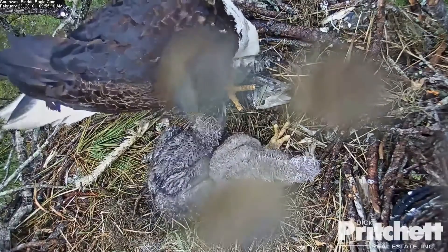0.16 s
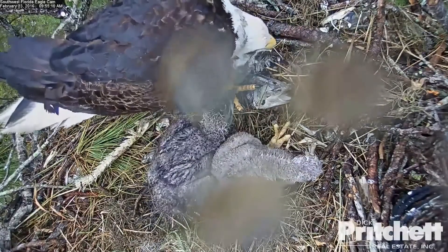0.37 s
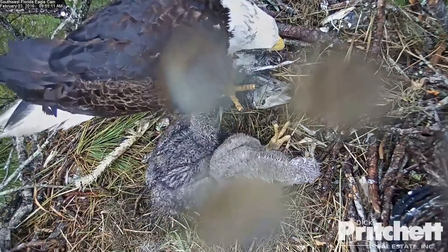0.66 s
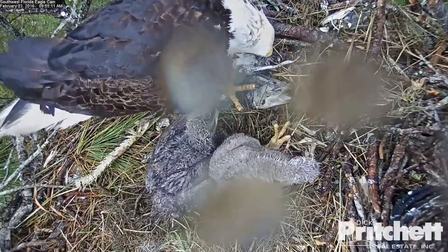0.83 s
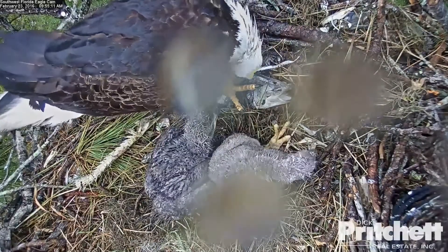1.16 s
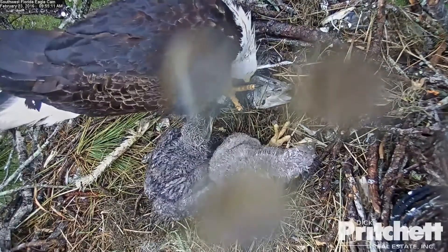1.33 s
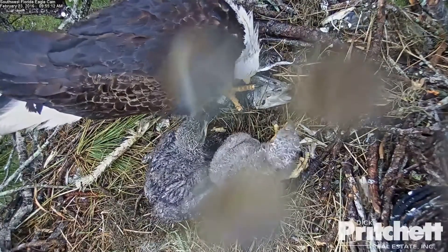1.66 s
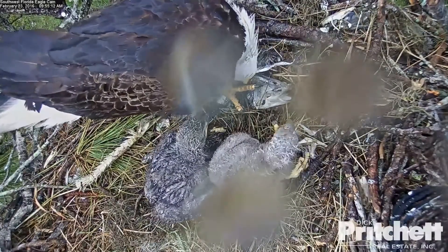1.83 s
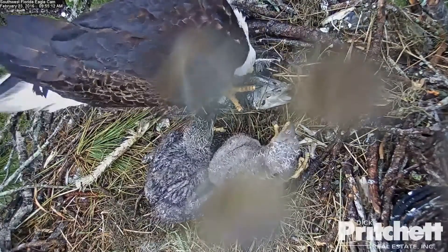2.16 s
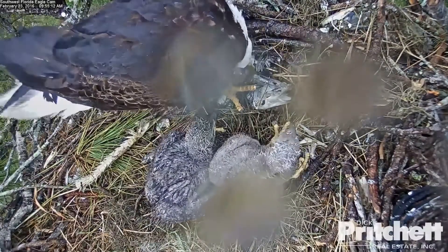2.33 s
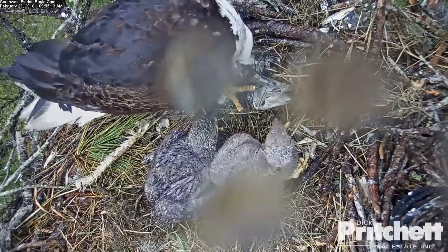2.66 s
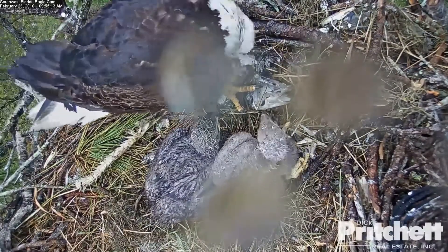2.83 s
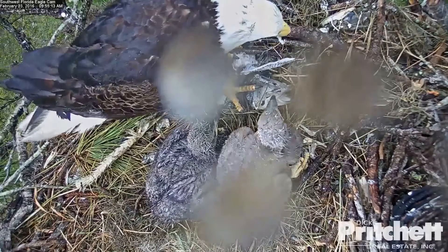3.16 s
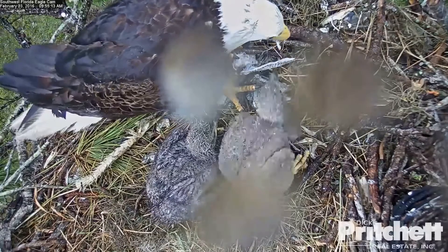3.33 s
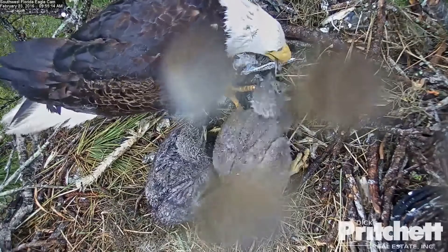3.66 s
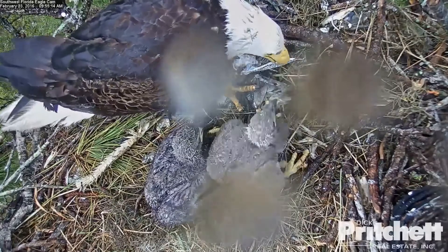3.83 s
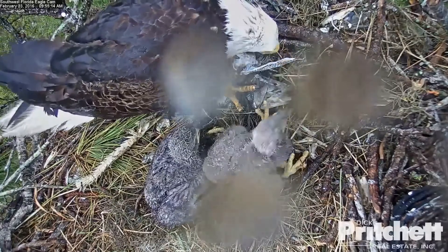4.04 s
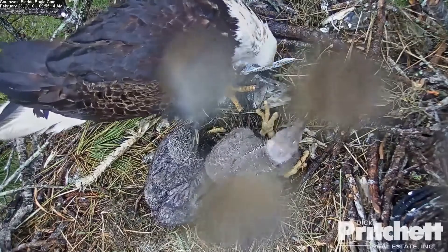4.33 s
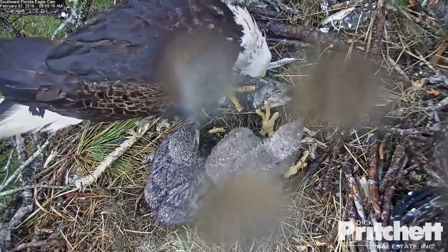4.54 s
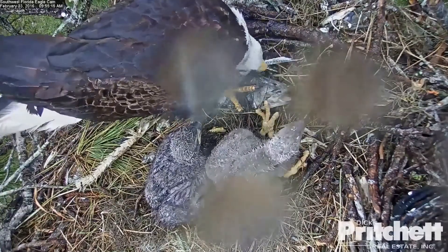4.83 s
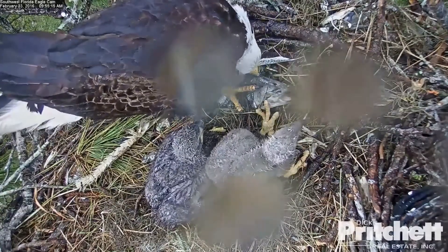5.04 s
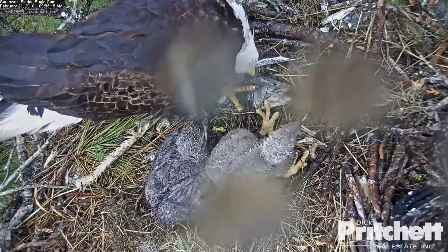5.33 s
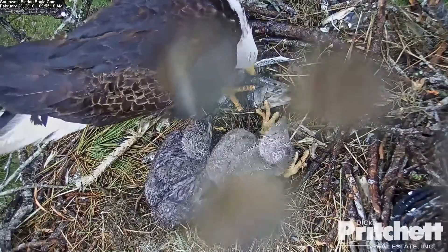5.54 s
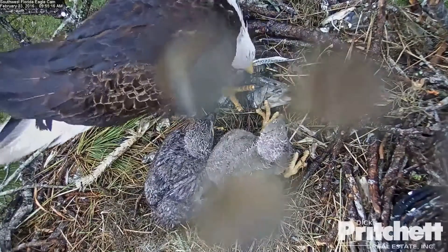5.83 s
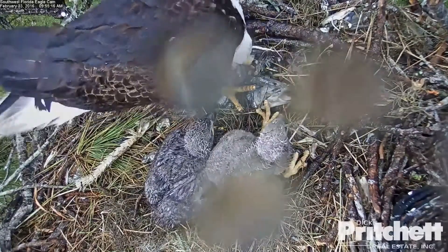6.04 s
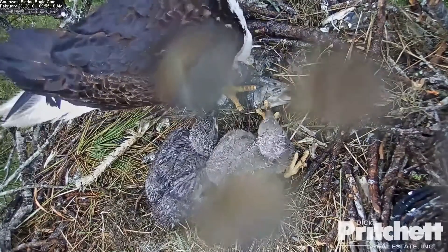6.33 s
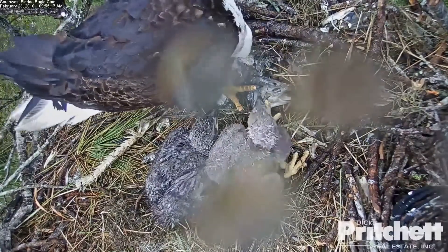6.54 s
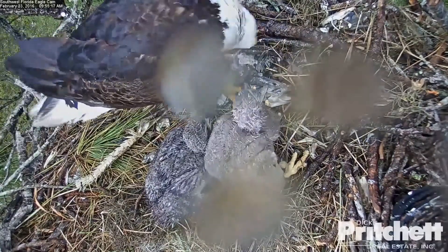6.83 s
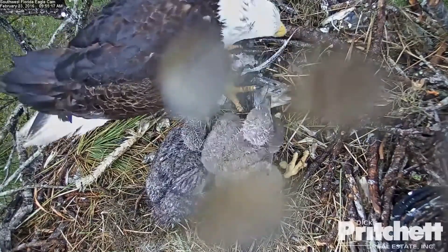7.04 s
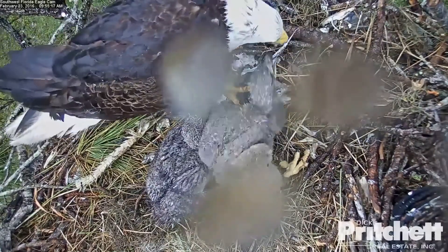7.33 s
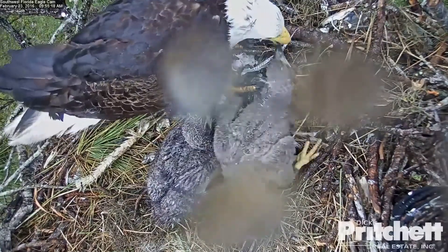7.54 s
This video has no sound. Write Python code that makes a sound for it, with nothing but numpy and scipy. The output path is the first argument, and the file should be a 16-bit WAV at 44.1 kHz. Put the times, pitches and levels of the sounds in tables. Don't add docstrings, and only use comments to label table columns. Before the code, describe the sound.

Thin, high whistles, tiny chips and one louder squealing call from young eagles, with steady rain hiss and lumpy wind buffeting the microphone.

```python
import sys
import numpy as np
from scipy import signal
from scipy.io import wavfile
from scipy.ndimage import uniform_filter1d

SR = 44100
rng = np.random.default_rng(int(sys.argv[2]) if len(sys.argv) > 2 else 0)


def linear_from_db(decibels):
    return 10 ** (np.asarray(decibels, float) / 20)


def master_out(mix):
    frames = np.transpose(np.atleast_2d(mix))
    ceiling = np.clip(frames, -1, 1)
    pcm = np.round(ceiling * 32767).astype(np.int16)
    wavfile.write(sys.argv[1], SR, pcm)


N = 338688
LATE_S = 1.682


def evened(x):
    return x / np.sqrt(np.mean(x ** 2) + 1e-20)


def steadied(x, hz):
    power = uniform_filter1d(x ** 2 + 1e-9, int(SR / hz))
    return evened(x / power ** .3)


def add(mix, s, sound):
    start = max(round((s + LATE_S) * SR), 0)
    part = mix[start:][:len(sound)]
    part += sound[:len(part)]


def wander(length, hz):
    span = max(int(SR / hz), 2)
    hiss = rng.standard_normal(length + 2 * span)
    return evened(uniform_filter1d(uniform_filter1d(hiss, span), span))[span:-span]


def noise(length, shape, size, patchy_db, wide, long):
    frames, hz = length * 4 // size + 5, np.fft.rfftfreq(size, 1 / SR)
    real, imaginary, patches = rng.standard_normal((frames, len(hz), 3)).T
    patches = uniform_filter1d(patches, max(int(wide), 1), 0)
    patches = evened(uniform_filter1d(patches, max(int(long), 1), 1))
    f, db = np.transpose(shape)
    colour_db = np.interp(np.log(hz + 1), np.log(f + 1), db, -90, -90)
    z = (real + 1j * imaginary) * linear_from_db(colour_db[:, None] + patchy_db * patches)
    return evened(signal.istft(z, nperseg=size, noverlap=size * 3 // 4)[1][:length])


def rain(length):
    # f/Hz, level per Hz/dB
    rush_colour = [(120, -31), (200, -1.5), (350, -9), (560, -12), (900, -17), (1390, -9.5), (1790, -13.5),
                   (2800, -7), (3700, -15.5), (5200, -31), (6850, -40.5), (7300, -48.5), (10500, -39.5),
                   (15000, -48.5)]
    # t/s, peak level/dB, f/Hz
    drops = [
        (0.7168, -14.5, 3050),
        (1.5194, -22, 4070),
        (1.7494, -23, 3570),
        (5.037, -29.5, 2820),
    ]
    rush_db = -30 - 2.9 - 1.6 * np.arange(length) / length
    out = linear_from_db(rush_db) * noise(length, rush_colour, size=512, patchy_db=1.16, wide=6, long=14)
    t = np.arange(300) / SR
    for s, db, hz in drops:
        decay = linear_from_db(db + 1 - 60 * t / 0.013)
        ring = np.sin(2 * np.pi * hz * t * (1 - 20. * t))
        add(out, s, decay * ring * np.minimum(t / .0004, 1))
    return out


def fuzzy(rows, length, width_hz, steady):
    out = np.zeros(length)
    for s, long, hz, db in rows:
        t = np.arange(0, long * 1.4, 1 / SR)
        size = wander(len(t), width_hz) + 1j * wander(len(t), width_hz) + steady
        drift = 1 + .025 * wander(len(t), 5)
        ringing = size * np.exp(2j * np.pi * np.cumsum(hz * drift) / SR)
        swell = np.hanning(len(t)) ** .7
        add(out, s - long * .2, linear_from_db(db) * evened(ringing.real) * swell)
    return out


def far_hums(length):
    # t/s, length/s, f/Hz, level/dB
    hums = [(-1.7, .2, 375, -43), (-1.35, .15, 360, -44), (-1.5, .3, 485, -47), (-.8, .5, 360, -43),
            (1.5, .16, 548, -44), (1.63, .14, 405, -42), (1.8, .4, 525, -47), (2.0, .26, 408, -42),
            (2.58, .16, 400, -39), (2.26, .12, 460, -44), (3.8, .12, 478, -43), (4.52, .14, 318, -43),
            (6.7, .14, 392, -41), (6.96, .12, 395, -40), (-1.2, .4, 236, -42), (1.55, .2, 270, -42),
            (.4, .9, 262, -45), (4.4, .16, 415, -43), (-.55, .25, 345, -43), (2.6, .12, 345, -42),
            (-.2, 1.6, 372, -46), (1.3, 1.3, 385, -46)]
    return linear_from_db(1.8) * fuzzy(hums, length, 18, 1.6)


def far_buzzes(length):
    # t/s, length/s, centre f/Hz, relative level/dB
    buzzes = [
        (-1.4, .2, 6300, -4),
        (-1.03, .1, 6300, -4),
        (1.83, .12, 6450, 2),
        (3.2, .12, 6250, 0),
        (3.36, .14, 6350, 0),
        (4.52, .14, 6450, 0),
        (7.47, .06, 6200, -1),
        (6.31, .22, 6400, 7),
        (2.09, .08, 6500, 3),
        (6.05, .12, 6500, 4),
    ]
    return linear_from_db(-55.5) * fuzzy(buzzes, length, 800, 0)


def wind():
    # t/s, level/dB
    steady_wind = [(0.0, -29), (0.32, -26), (0.72, -40), (1.1, -26), (1.4, -30), (1.85, -28), (2.2, -23),
                   (2.55, -26), (2.95, -23), (3.3, -25), (3.8, -22), (4.3, -23), (4.9, -27), (5.6, -22),
                   (6.27, -33), (6.7, -24), (7.45, -29), (7.68, -40)]
    # t/s, length/s, rumble level/dB, flutter level/dB
    gusts = [(0.6, 0.22, -22, -27), (0.79, 0.1, -18, -25), (0.93, 0.09, -19, -22), (1.03, 0.04, -24, -27),
             (1.55, 0.05, -23, -37), (1.7, 0.2, -24, -31), (2.05, 0.06, -17, -45), (2.38, 0.08, -21, -33),
             (2.75, 0.04, -20, -35), (2.85, 0.04, -17, -26), (3.04, 0.04, -14, -18), (3.14, 0.04, -18, -45),
             (3.54, 0.14, -18, -24), (3.67, 0.05, -16, -37), (4.01, 0.05, -17, -21), (4.13, 0.06, -24, -26),
             (4.47, 0.05, -21, -45), (4.69, 0.04, -15, -45), (5.06, 0.06, -20, -33), (5.36, 0.1, -20, -28),
             (5.52, 0.05, -20, -21), (5.76, 0.06, -19, -29), (6.02, 0.06, -22, -35), (6.11, 0.06, -17, -34),
             (6.47, 0.22, -22, -32), (6.62, 0.15, -23, -25), (6.81, 0.04, -26, -36), (7.0, 0.2, -24, -29),
             (7.33, 0.04, -25, -29), (7.58, 0.12, -20, -25)]
    # f/Hz, level per Hz/dB
    rumble_colour = [(6, -20.5), (15, -4.5), (27, 0), (50, -4), (90, -12.5), (140, -36)]
    # f/Hz, level per Hz/dB
    flutter_colour = [(60, -26), (95, 1.5), (150, -4.5), (250, -12.5), (400, -22), (600, -44)]
    # t/s, peak level/dB, f/Hz, number of cycles
    buffets = [(.578, -18.5, 230, 1.2), (1.665, -19.5, 179, 1.2), (2.85, -12.5, 190, 0.61),
               (3.04, -8.5, 92, 1.3), (3.052, -16, 250, 1.2), (3.61, -13.5, 130, 0.89),
               (3.98, -12.5, 75, 0.73), (4.005, -11.5, 220, 1.3), (4.022, -15.5, 260, 1.9),
               (5.51, -13, 190, 1.4), (6.58, -17.5, 170, 1.06), (7.335, -20.5, 170, 1.35)]

    t, slow = np.arange(N) / SR, np.arange(0, N, 128) / SR
    s, long, rumble_db, flutter_db = np.transpose(gusts)
    swells = np.exp(-(1.7 * (slow[:, None] - s) / long) ** 2)
    steady_db = np.interp(slow, *np.transpose(steady_wind))
    low_power = linear_from_db(steady_db) ** 2 + swells @ linear_from_db(rumble_db - .2) ** 2
    fast_power = linear_from_db(.57 * steady_db - 19) ** 2 + swells @ linear_from_db(flutter_db - 1.2) ** 2
    lumps_db = 1.5 * wander(N, 12.8)
    rumble = steadied(noise(N, rumble_colour, size=8192, patchy_db=0.3, wide=3, long=2), 12)
    flutter = steadied(noise(N, flutter_colour, size=4096, patchy_db=0.6, wide=4.5, long=2), 14)
    out = rumble * np.interp(t, slow, np.sqrt(low_power))
    out += flutter * np.interp(t, slow, np.sqrt(fast_power)) * linear_from_db(lumps_db)
    for s, db, hz, cycles in buffets:
        u = np.arange(-2, 2, hz / SR / cycles)
        buffet = linear_from_db(db) * np.exp(-2 * u ** 2) * np.cos(2 * np.pi * cycles * u)
        add(out, s - LATE_S - 2 * cycles / hz, buffet)
    return .6 * np.tanh(out / .6)


def whistle(rows, waver, shimmer_db, edge_s, clean, haze_db):
    s, *columns = np.transpose(rows)
    t = np.arange(s[0] - edge_s / 2, s[-1] + edge_s / 2, 1 / SR)
    hz, db, over_db = (uniform_filter1d(np.interp(t, s, c), 130) for c in columns)
    turn = 2 * np.pi * np.cumsum(hz * (1 + waver * wander(len(t), 120))) / SR
    tone = (1 + linear_from_db(haze_db) * wander(len(t), 1500)) * np.sin(turn)
    tone += linear_from_db(over_db) * (clean + (1 - clean) * wander(len(t), 1300)) * np.sin(2 * turn)
    fade = signal.windows.tukey(len(t), min(2 * edge_s * SR / len(t), 1))
    return t[0], np.sqrt(2) * linear_from_db(db + shimmer_db * wander(len(t), 90)) * tone * fade


def chips():
    # t/s, length/s, start f/Hz, end f/Hz, level/dB
    chip_table = [(-1.582, .008, 4100, 3100, -34), (-1.345, .008, 3700, 3200, -35),
                  (-.855, .015, 4000, 3600, -42), (1.482, .008, 3800, 3400, -41),
                  (4.543, .011, 3450, 3050, -33), (-1.334, .009, 3080, 2950, -35),
                  (-1.57, .018, 3600, 3450, -41), (5.033, .009, 3600, 3450, -36),
                  (5.048, .014, 3150, 3300, -36), (.94, .008, 4300, 3900, -44),
                  (1.65, .008, 3650, 3550, -39), (6.335, .012, 3900, 3600, -30),
                  (6.358, .01, 2900, 2700, -32), (.727, .012, 2850, 2700, -35),
                  (4.65, .01, 3850, 3700, -41), (4.676, .008, 2950, 2800, -36),
                  (3.825, .014, 2900, 3100, -37)]
    return [[(s, high, db - 0.5), (s + long, low, db + 4.0)] for s, long, high, low, db in chip_table]


def tweets():
    # t/s, length/s, top f/Hz, level/dB
    tweet_table = [
        (-1.666, .048, 3960, -28),
        (1.372, .062, 4010, -25),
        (7.568, .044, 4010, -24),
    ]
    # share of length, pitch over top pitch, relative level/dB
    course = [(0, .85, -9), (.15, .96, -6), (.45, 1.0, -8), (.8, .92, 3), (1, 1.09, -11)]
    return [[(s + k * long, ratio * hz, db + rel_db) for k, ratio, rel_db in course]
            for s, long, hz, db in tweet_table]


def quick_peeps():
    # t/s, length/s, edge f/Hz, middle f/Hz, level/dB
    bows = [
        (-.818, .028, 4700, 3540, -27),
        (-1.414, .013, 3700, 3550, -32),
        (4.921, .025, 3500, 3900, -26),
        (1.305, .05, 4060, 4160, -41),
        (5.312, .042, 2750, 4150, -31),
    ]
    # t/s, length/s, start f/Hz, end f/Hz, level/dB
    falls = [
        (-1.44, .016, 4450, 2700, -26),
        (3.857, .043, 2450, 2400, -35),
        (4.626, .008, 3940, 3400, -29),
        (4.709, .006, 3900, 3250, -28),
        (5.422, .006, 3500, 2950, -34),
        (5.747, .012, 2560, 2470, -23),
        (5.024, .009, 4480, 4300, -31),
        (7.657, .009, 3900, 2950, -27),
        (5.347, .007, 3700, 2900, -27),
    ]
    u = np.linspace(0, 1, num=9)
    bow = np.sin(np.pi * u)
    peeps = [np.c_[s + u * long, edge + (mid - edge) * abs(bow) ** .7, db - 3 * (1 - bow)]
             for s, long, edge, mid, db in bows]
    for s, long, high, low, db in falls:
        halfway = low + .6 * (high - low)
        peeps.append([(s, high, db - 1), (s + long / 2, halfway, db), (s + long, low, db - 3)])
    return [[(s, hz, db - 15 * max(hz - 3700, 0) / 1e3) for s, hz, db in rows] for rows in peeps]


def chicks(length):
    # t/s, f/Hz, level/dB
    whistles = [
        [(0.95, 3210, -33), (0.97, 3330, -32), (1.076, 3530, -39), (1.125, 3640, -37), (1.15, 3780, -42),
         (1.22, 3850, -48), (1.3, 3920, -46), (1.345, 4000, -41), (1.39, 3990, -42)],
        [(1.495, 3950, -40), (1.505, 4060, -40), (1.55, 4040, -41), (1.575, 3800, -50), (1.585, 3700, -44),
         (1.6, 3900, -48)],
        [(1.607, 3960, -39), (1.632, 3850, -34), (1.642, 3850, -48), (1.655, 3950, -43), (1.668, 3620, -33),
         (1.683, 3130, -25)],
        [(5.066, 3700, -36), (5.085, 3800, -39), (5.125, 3510, -44), (5.135, 3550, -46), (5.148, 3560, -36),
         (5.204, 3560, -37), (5.24, 3700, -41), (5.262, 3740, -46)],
        [(5.268, 3760, -37), (5.285, 3700, -36), (5.315, 3550, -36), (5.34, 3620, -38), (5.368, 3740, -29),
         (5.425, 3570, -35), (5.455, 3745, -31), (5.487, 3650, -33.5), (5.51, 3780, -33)],
        [(5.51, 3780, -33), (5.56, 3830, -33), (5.62, 4010, -34), (5.69, 4040, -38), (5.697, 4060, -44),
         (5.705, 4110, -36), (5.722, 3950, -31), (5.747, 2800, -24)],
    ]
    # t/s, f/Hz, level/dB
    warbles = [
        [(2.022, 3060, -29), (2.06, 3250, -25), (2.084, 3510, -29.5), (2.115, 3230, -24), (2.15, 3250, -26),
         (2.182, 3120, -34)],
        [(3.952, 2860, -42), (4.0, 2900, -41), (4.03, 3100, -39), (4.045, 3170, -33), (4.08, 3110, -35),
         (4.126, 3140, -33), (4.185, 3370, -33)],
        [(4.187, 3370, -34), (4.21, 3240, -29), (4.225, 3240, -31), (4.255, 3430, -34), (4.262, 3400, -44),
         (4.298, 3620, -39)],
        [(4.44, 3800, -48), (4.465, 4220, -44), (4.492, 4430, -42), (4.51, 4390, -43), (4.528, 4100, -47)],
        [(6.217, 4000, -46), (6.24, 4520, -45), (6.254, 4200, -46), (6.268, 3700, -42)],
        [(-.524, 3560, -36), (-.514, 3780, -29), (-.497, 3380, -31)],
        [(4.726, 3900, -36), (4.731, 3560, -29), (4.738, 3560, -29), (4.754, 2850, -31)],
    ]
    # t/s, f/Hz, level/dB, relative octave overtone level/dB
    call = [
        [(6.052, 2760, -41, -40), (6.064, 2920, -28, -35), (6.082, 3200, -21, -24), (6.095, 3350, -18, -21)],
        [(6.097, 2934, -22, -8), (6.125, 3020, -22, -9), (6.158, 3010, -22.5, -8.5), (6.176, 2890, -23, -10),
         (6.22, 2880, -23, -10), (6.232, 2780, -24.5, -11.5), (6.248, 2790, -24.5, -11.5),
         (6.26, 3002, -24, -8), (6.308, 3230, -25, -12)],
        [(6.31, 3330, -27, -35), (6.325, 3480, -28, -35), (6.355, 3560, -24, -30), (6.38, 3600, -21, -22),
         (6.39, 3480, -20.5, -19), (6.415, 3410, -20.5, -16), (6.46, 3393, -22, -24), (6.474, 3250, -28, -36)],
        [(6.476, 3050, -33, -36), (6.485, 2620, -30, -35), (6.503, 2350, -31, -35)],
    ]
    out = np.zeros(length)
    for edge_s, group in ((.008, whistles + warbles + tweets()), (.005, quick_peeps() + chips())):
        for rows in group:
            rows = [(s, hz, db, -20 if hz < 2700 else -27 if hz < 3400 else -33) for s, hz, db in rows]
            clean = .8 if rows[0][1] < 2700 else .05
            add(out, *whistle(rows, .004, 1.3, edge_s, clean, -14))
    for rows in call:
        add(out, *whistle(rows, .005, 1.3, .005, .75, -11))
    echoes = np.zeros(1800)
    echoes[rng.integers(60, 1800, size=30)] = rng.standard_normal(30) * linear_from_db(-27.5)
    return out + signal.oaconvolve(out, echoes)[:length]


def scene():
    late = round(LATE_S * SR)
    length = N + late
    gusts = wind()
    feed = rain(length) + far_hums(length) + far_buzzes(length) + chicks(length)
    return (feed[late:] + feed[:N] + gusts)[None]


def low_pass(x):
    return signal.sosfilt(signal.butter(12, 14860, fs=SR, output="sos"), x)


def record(dry):
    return low_pass(dry)


dry = scene()
out = record(dry)
master_out(out)
```